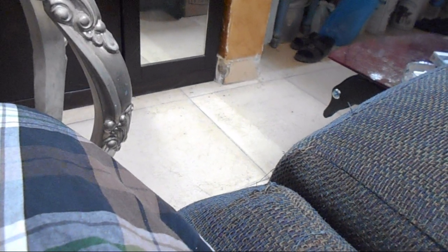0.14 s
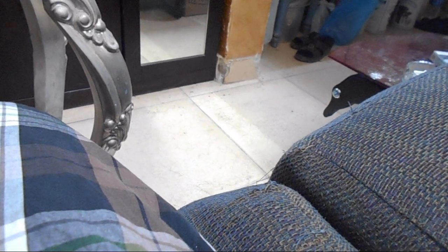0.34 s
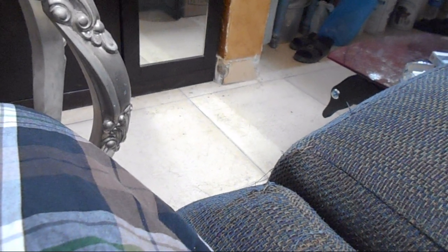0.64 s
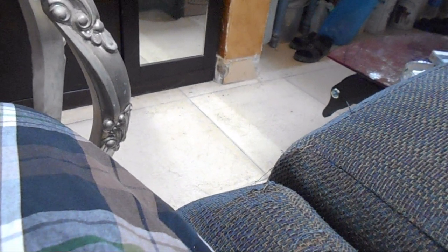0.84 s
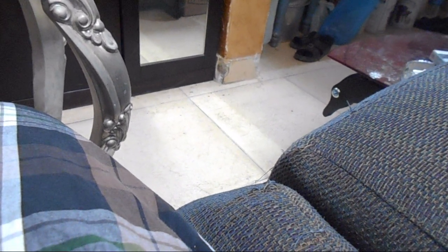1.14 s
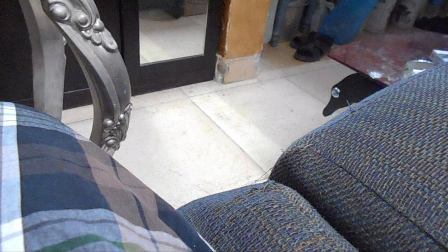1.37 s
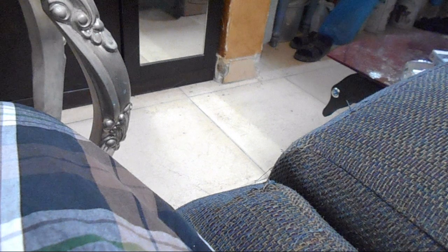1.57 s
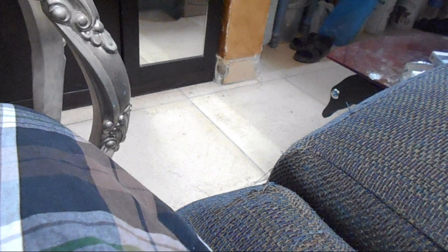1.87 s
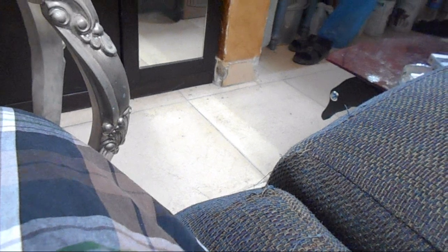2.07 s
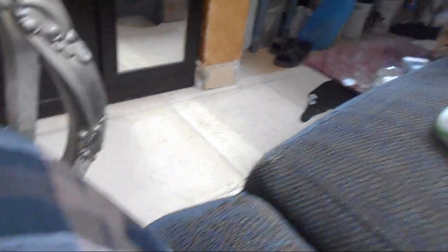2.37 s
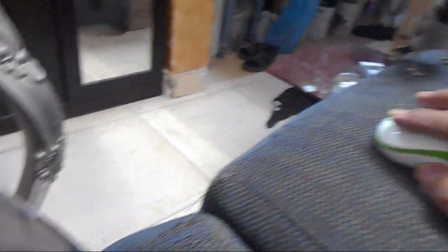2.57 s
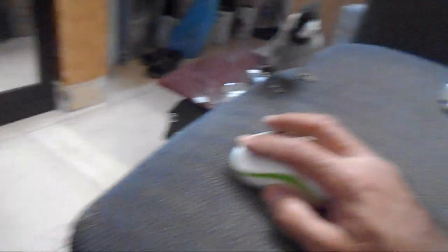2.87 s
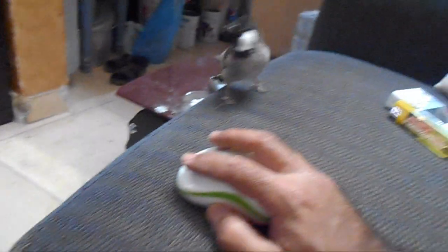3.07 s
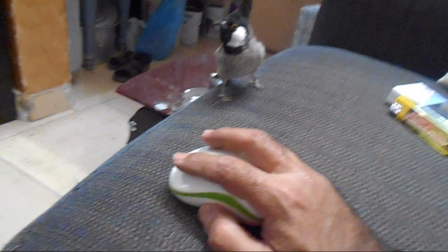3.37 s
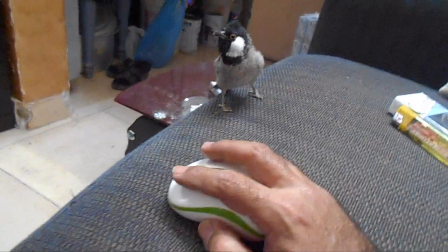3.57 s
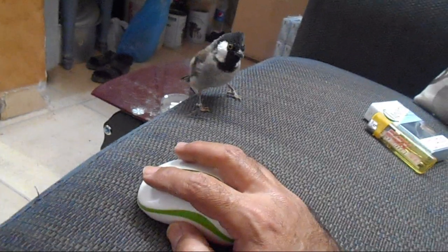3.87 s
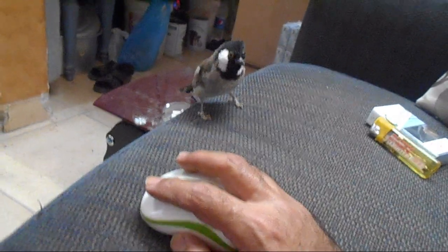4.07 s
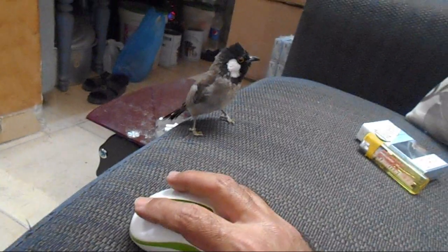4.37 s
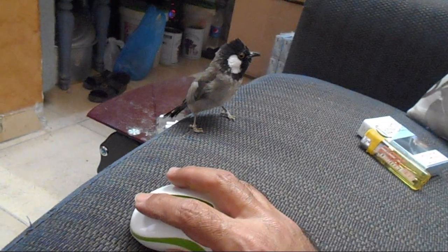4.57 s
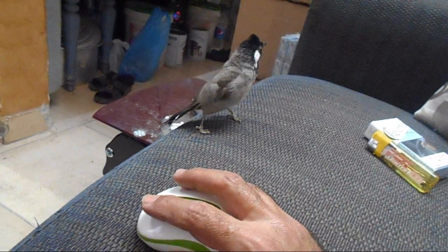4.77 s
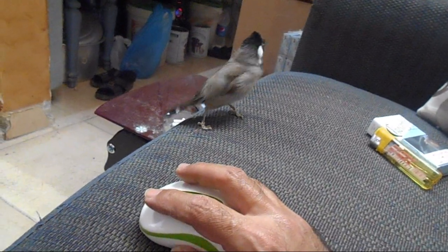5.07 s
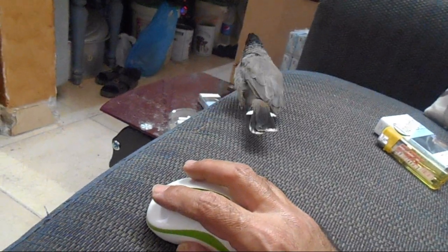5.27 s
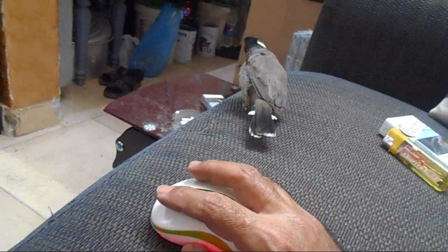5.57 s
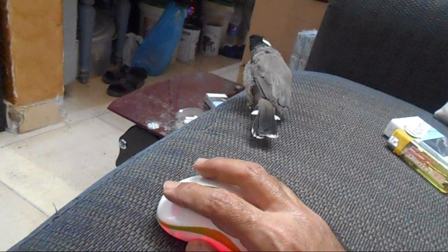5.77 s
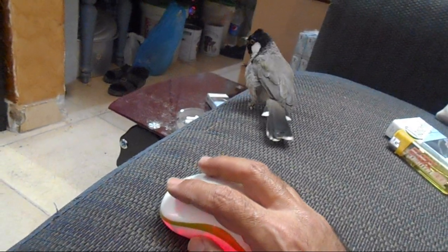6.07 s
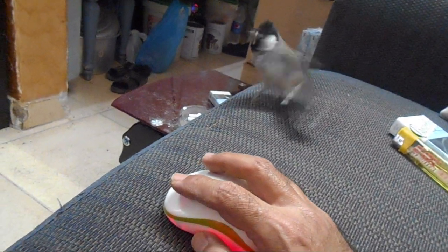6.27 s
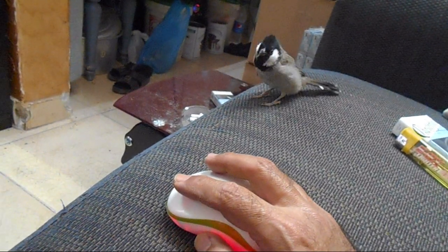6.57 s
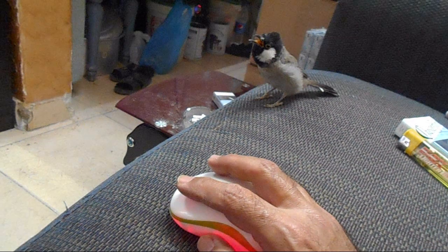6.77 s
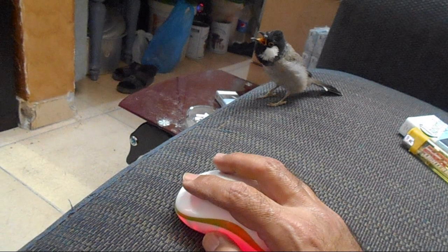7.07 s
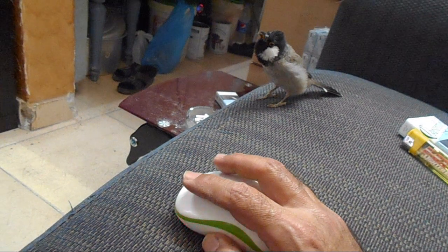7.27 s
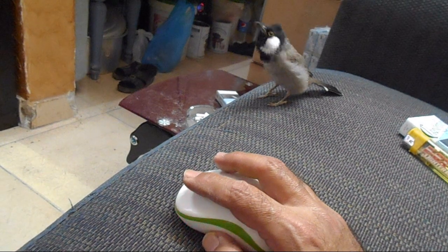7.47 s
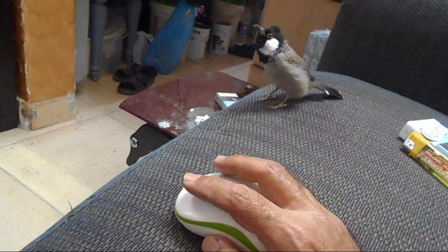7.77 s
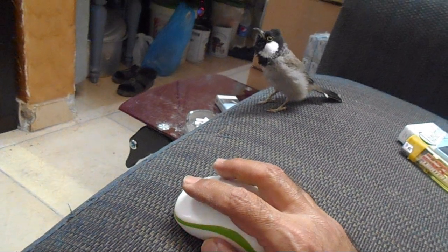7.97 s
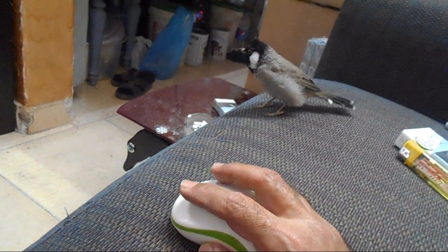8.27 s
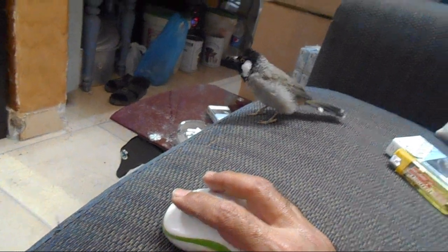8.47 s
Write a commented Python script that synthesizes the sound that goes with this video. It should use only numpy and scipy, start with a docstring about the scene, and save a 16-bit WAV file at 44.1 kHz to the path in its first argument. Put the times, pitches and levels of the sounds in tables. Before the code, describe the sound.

Indoors in a hard tiled room, a bird further off whistles a quick run of gliding notes, smeared by echo. A mouse button clicks sharply, press then release. A soft swish follows as the camera turns, with tiny claw ticks. The far bird whistles again twice, the near bird gives one soft raspy twitter, and a last whistled phrase closes. Close mono camera microphone, constant hiss and faint hum.

```python
"""A tiled room with a sofa, heard through a mono camera microphone close to a small songbird.
A second bird further off whistles four phrases, sine glides smeared by dense wall reflections.
The near bird softly twitters once: overtone stacks with pulsed hiss, shaped by throat and beak.
A mouse button clicks (ringing spring, rattling shell); claws, hops on the cushion and the swish of the
turning camera are shaped noise. Filtered noise makes hiss and a fading murmur, thin sines a faint machine hum."""
import sys
import numpy as np
from scipy import signal
from scipy.fft import rfft, irfft, next_fast_len
from scipy.io import wavfile
from scipy.ndimage import map_coordinates

SR = 44100
rng = np.random.default_rng(int(sys.argv[2]) if len(sys.argv) > 2 else 0)


def unload_wav(signal):
    """Save mono or channel-first audio to the path in sys.argv[1] as 16-bit WAV at rate SR, clipped to [-1, 1]."""
    wavfile.write(
        sys.argv[1],
        SR,
        np.round(np.clip(np.atleast_2d(signal).T, -1, 1) * 32767).astype(np.int16),
    )


def how_loud(loudness_db):
    """Turn decibels into a plain amplitude multiplier (0 dB gives 1, 20 dB gives 10)."""
    steps = np.asarray(loudness_db, float) / 20
    return 10 ** steps


N = 380583
TIME = np.arange(N) / SR


def unit(x):
    """Scales a sound to an rms of 1."""
    return x / np.sqrt(np.mean(x ** 2) + 1e-20)


def along(points, hz):
    """Reads a curve of (frequency [Hz], value) points on a log frequency axis."""
    f, v = np.transpose(points)
    return np.interp(np.log(hz + 1), np.log(f + 1), v)


def wobble(rate, size=N):
    """A smooth random curve through normal-distributed knots, rate knots a second."""
    knots = rng.standard_normal(int(size * rate / SR) + 4)
    return map_coordinates(knots, [np.arange(size) * rate / SR])


def coloured(x, spectrum):
    """Equalises x with a curve of (frequency [Hz], gain [dB]) points."""
    m = next_fast_len(len(x) + 8192)
    gain = how_loud(along(spectrum, np.fft.rfftfreq(m, 1 / SR)))
    return irfft(rfft(x, m) * gain, m)[:len(x)]


def add(track, s, x):
    """Mixes x into track from second s."""
    part = track[round(s * SR):][:len(x)]
    part += x[:len(part)]


def tail(gap_s, rise_s, early_db):
    """A room answer of energy 1: each frequency dies at its own speed, after a louder cluster of near walls."""
    # reverberation of the tiled room: (frequency [Hz], time to fall 60 dB [s])
    room_t60 = [(500, 0.705), (2500, 0.321), (8000, 0.25)]
    hz, t, z = signal.stft(rng.standard_normal(SR // 2), SR, nperseg=256)
    decay = how_loud(-60 * t / along(room_t60, hz)[:, None])
    h = signal.istft(z * decay, SR, nperseg=256)[1]
    t = np.arange(len(h)) / SR
    onset = 1 - np.exp(-t / rise_s)
    near_walls = 1 + how_loud(early_db) * np.exp(-t / 0.0265)
    h = np.pad(h * onset * near_walls, (round(gap_s * SR), 0))
    return h / np.linalg.norm(h)


def background():
    """Steady hiss, a low murmur of air that fades as the camera turns, and thin, unsteady motor lines."""
    # room air and microphone hiss: (frequency [Hz], relative level per Hz [dB])
    air = [(12, -19.5), (22, 5.5), (45, -8), (90, -9), (190, -6.5), (358, -2), (480, -6), (1100, -7),
           (1850, -7), (2480, -8.5), (5000, -12), (9810, -13.5), (11200, -20.5), (14600, -71),
           (22000, -120)]
    # low air murmur: (level before [dB], level after [dB]) and (fade start [s], fade end [s])
    murmur_db = (-64.5, -72)
    murmur_fades_s = (1.49, 5.5)
    # audible multiples of the motor rate: (multiple)
    hum = [2, 5, 7, 8, 10, 18, 19, 20, 21, 22, 23, 24, 25, 26, 27]
    # their mean strengths: (level before the camera turns [dB], level after [dB])
    hum_db = [(-77.5, -77), (-72, -75.5), (-85.5, -75), (-72, -84), (-76, -75.5), (-84.5, -86), (-75, -89),
              (-76, -82.5), (-76.5, -76.5), (-79, -75.5), (-90.5, -82.5), (-83, -72.5), (-73, -77),
              (-75.5, -83), (-77, -82.5)]
    # other steady tones: (frequency [Hz], mean level [dB])
    whines = [(101, -79), (199.5, -77), (263, -73), (1911, -79), (3015, -81), (10121, -80)]
    motor_hz, turn_s = 74.92, 3.23

    hiss = how_loud(-56.5) * unit(coloured(rng.standard_normal(N), air))
    murmur_colour = [(150, -18.5), (300, -8.0), (600, 3), (850, -5), (1200, -25.5)]
    murmur = unit(coloured(rng.standard_normal(N), murmur_colour))
    out = hiss + how_loud(np.interp(TIME, murmur_fades_s, murmur_db)) * murmur

    turned = np.clip((TIME - turn_s) / .5 + .5, 0, 1)  # 0 before the turn, 1 after it
    lines = [(k * motor_hz, a + (b - a) * turned) for k, (a, b) in zip(hum, hum_db)]
    for hz, db in lines + whines:
        level = np.sqrt(2) * how_loud(db + 2.515 * wobble(4))
        out += level * np.sin(2 * np.pi * hz * TIME + 0.667 * wobble(6))
    return out


def burst(colour, length, rise_s):
    """A puff of coloured noise with peak 1, rising and dying exponentially."""
    t = np.arange(SR // 20) / SR
    envelope = np.exp(-t / length) * (1 - np.exp(-t / rise_s))
    x = coloured(rng.standard_normal(len(t)), colour) * envelope
    return x / np.max(np.abs(x))


def cushion_and_swish():
    """Claw ticks and dull bumps as noise puffs; the camera's turning swish and hop rustle as grainy swells."""
    # claw ticks in the weave: (time [s], peak level [dB], pitch [Hz], decay time constant [s])
    ticks = [(2.8158, -40.5, 8600, 0.00174), (3.369, -43.5, 9370, 0.00235), (3.402, -44, 8890, 0.0031),
             (3.4082, -43.5, 8500, .003), (3.414, -37, 6361, 0.0034), (3.4264, -32.5, 7300, 0.0014),
             (3.429, -28.5, 7000, 0.00057), (7.256, -49.5, 8000, .003), (7.3698, -41, 8600, 0.00264)]
    # soft bumps: (time [s], peak level [dB], strongest frequency [Hz], decay time constant [s])
    bumps = [(5.353, -45.5, 141, 0.0123), (6.423, -51, 500, 0.022), (6.444, -42.5, 1104, 0.0065)]
    # the swish of the turning camera (first two rows), then cloth rustle from hops on the cushion:
    # (peak time [s], rise over 20 dB [s], fall over 20 dB [s], level [dB], share of fine bright noise [0-1])
    swells = [(2.63, 0.117, 0.63, -55, 0.304), (2.8, 0.4, 0.43, -60.5, 0.9984),
              (2.923, 0.015, 0.0504, -43, 0.968), (3.922, 0.022, 0.016, -47, 0.85),
              (5.234, .03, 0.115, -56.5, 1)]
    # coarse and fine grainy noise: (frequency [Hz], relative level per Hz [dB])
    coarse_colour = [(1000, -9.5), (2500, -6.5), (4200, 2.5), (6500, -2.5), (9000, -9), (11000, -20)]
    fine_colour = [(2000, -13), (4000, -30.5), (6000, -11), (8500, -1.5), (10500, -9)]

    out = np.zeros(N)
    for s, db, hz, length in ticks:
        colour = [(700, -30), (1500, -16), (hz * 0.834, -12), (hz, 0), (hz * 1.257, -9), (hz * 2, -20)]
        add(out, s, how_loud(db) * burst(colour, length, rise_s=0.00075))
    for s, db, hz, length in bumps:
        colour = [(hz * 0.215, -6), (hz, 0), (hz * 2.36, -24)]
        add(out, s, how_loud(db) * burst(colour, length, rise_s=0.00114))

    def grainy(colour):
        """Coloured noise whose level flickers quickly."""
        return unit(coloured(rng.standard_normal(N) * how_loud(1.72 * wobble(500)), colour))

    coarse, fine = grainy(coarse_colour), grainy(fine_colour)
    for s, rise, fall, db, share in swells:
        swell = how_loud(db - 20 * np.maximum((s - TIME) / rise, (TIME - s) / fall))
        out += swell * (np.sqrt(share) * fine + np.sqrt(1 - share) * coarse)
    return out


def ring(modes, t):
    """Sums damped sine modes, with new strengths for each blow."""
    out = np.zeros(len(t))
    for hz, db, t60 in modes:
        out += how_loud(db + rng.normal(0, 1.78) - 60 * t / t60) * np.sin(2 * np.pi * hz * t)
    return out


def mouse():
    """The spring snaps, brighter on the press than on the release; the shell rattles a moment later."""
    # button press and release: (time [s], snap peak level [dB], rattle relative to it [dB],
    # spring tilt [dB per octave])
    clicks = [(1.3993, -16.5, -18, 5.5), (1.6032, -13, -21, -4)]
    # modes of the switch spring: (frequency [Hz], relative level [dB], time to fall 60 dB [s])
    spring = [(7300, -4.5, 0.0177), (7810, 2.5, 0.0139), (8600, 2.5, 0.0098), (9330, -3.5, 0.0152),
              (10153, 1, 0.0068)]
    # rattle of the plastic shell: (frequency [Hz], relative level [dB])
    shell = [(1200, -18.5), (2800, -7), (3500, -4), (4500, -11), (5700, -3), (6600, -17), (8000, -24)]

    out, t = np.zeros(N), np.arange(SR // 10) / SR
    onset = (t / .0011) ** 2 / (1 + (t / 0.0016) ** 2)
    punch = 1 + 3 * np.exp(-(t / 0.00163) ** 2)
    rattle_shape = np.exp(-t / 0.00289) * (1 - np.exp(-t / 0.00055))
    for s, db, shell_db, tilt_db in clicks:
        modes = [(hz, level + tilt_db * np.log2(hz / 8000), t60) for hz, level, t60 in spring]
        snap = ring(modes, t) * onset * punch
        rattle = unit(coloured(rng.standard_normal(len(t)), shell)) * rattle_shape
        add(out, s, how_loud(db) * snap / np.max(np.abs(snap)))
        add(out, s + 0.00043, how_loud(db + shell_db) * rattle)
    return out


def song():
    """The far bird's notes as (s, pitch Hz, gain) per sample; pitch drifts and level fades as breath slackens."""
    # plain whistles that slide onto their pitch: (time [s], length [s], from [Hz], onto [Hz],
    # drifts towards [Hz], relative level [dB], fade [dB])
    slides = [(0.414, 0.023, 2640, 2540, 2398, -51, 11.5), (.45, 0.0485, 1968, 2276, 2241, -37, 6.5),
              (0.684, 0.0208, 2615, 2394, 1894, -47, 14.5), (0.781, 0.0403, 2035, 2061, 2064, -45, 1),
              (0.855, 0.0245, 2943, 3035, 2066, -46, -8.5), (4.218, .082, 1468, 2455, 2660, -37, 5.5),
              (4.311, 0.0365, 3410, 3346, 2822, -44, 9.5)]
    # notes with a soft lead-in that jumps up or down to the main tone: (time of the jump [s], lead-in [s],
    # lead-in pitch [Hz], main length [s], main pitch [Hz], drifts towards [Hz], relative level [dB], fade [dB])
    leaps = [(0.542, 0.0128, 1719, 0.0479, 2632, 2696, -34, 3),
             (0.645, 0.0039, 3332, 0.062, 2922, 2806, -33.5, 4.5),
             (0.821, 0.01434, 1546, 0.0304, 2671, 2539, -35.5, 16),
             (3.621, 0.00664, 3236, 0.041, 2876, 2829, -35.5, 13.5),
             (3.695, 0.0164, 1704, 0.0214, 2340, 2092, -34, 20),
             (3.76, 0.0054, 3238, 0.0568, 2966, 2528, -37, 1),
             (3.888, .008, 1512, .042, 2655, 2687, -35.5, 15),
             (4.123, .004, 3260, .042, 2659, 2461, -39.5, 9),
             (8.327, 0.01126, 3208, 0.033, 2874, 2787, -34.5, 7),
             (8.394, 0.0156, 1742, 0.0346, 2351, 2036, -40.5, 10),
             (8.463, 0.0115, 3160, 0.0607, 2885, 2531, -27.5, 17),
             (8.58, 0.0146, 1565, 0.043, 2663, 2672, -34, 21)]
    # time constants [s] of the slackening breath, the slide, the swell and the jump
    breath_s, settle_s, swell_s, leap_s = 0.0283, 0.00502, 0.00356, 0.002714
    lead_db = -15.5  # the lead-in under the main tone

    for s, length, start_hz, onto_hz, last_hz, db, fade_db in slides:
        t = np.arange(0, length, 1 / SR)
        slack = 1 - np.exp(-t / breath_s)
        aim = onto_hz + (last_hz - onto_hz) * slack
        hz = aim + (start_hz - onto_hz) * np.exp(-t / settle_s)
        yield s, hz, how_loud(db - fade_db * slack) * (1 - np.exp(-t / swell_s)) ** 2

    for s, lead, lead_hz, length, main_hz, last_hz, db, fade_db in leaps:
        after = np.maximum(np.arange(-lead, length, 1 / SR), 0)
        away = np.exp(-after / leap_s)  # share of the jump still to go
        slack = 1 - np.exp(-after / breath_s)
        aim = main_hz + (last_hz - main_hz) * slack
        # upward jumps are loud on the way, downward ones only on landing
        power = 2.37 if lead_hz < main_hz else 0.804
        gain = how_loud(db + lead_db * away ** power - fade_db * slack)
        yield s - lead, aim + (lead_hz - main_hz) * away, gain


def far_bird():
    """Slightly fluttering whistles heard mostly through the walls, which smear each glide into a band."""
    out = np.zeros(N)
    for s, hz, gain in song():
        k = np.arange(len(hz))
        soft_ends = np.clip(np.minimum(k / (.001 * SR), k[::-1] / (0.0023 * SR)), 0, 1)
        flutter = wobble(145.8, size=len(hz))  # moves level and pitch together
        phase = 2 * np.pi * np.cumsum(hz * (1 + 0.0123 * flutter)) / SR
        direct = np.sqrt(2) * gain * soft_ends * how_loud(1.51 * flutter) * np.sin(phase)
        walls = signal.fftconvolve(direct, tail(gap_s=0.000989, rise_s=0.0026, early_db=6.5))
        # the walls return a steady share of each note's energy
        walls *= np.linalg.norm(direct) / np.linalg.norm(walls)
        add(out, s, how_loud(-8) * direct)
        add(out, s, how_loud(4.5) * walls)
    return out


def twitter():
    """The near bird's notes as rows of (s, pitch Hz, relative level dB, overtones dB, rasp dB)."""
    # raspy falling churrs: (time [s], buzz length [s], from [Hz], relative level [dB],
    # ends below the middle [dB], rasp [dB], trailing murmur [s])
    churrs = [(7.189, 0.0179, 1406, -43, 8, -9, 0.0285), (7.504, 0.02535, 1675, -35.5, 3.5, 1, 0.0145),
              (7.649, 0.0172, 1254, -42.5, 4, -11, 0.0238)]
    # overtones of a churr: (at the start [dB], at the end of the buzz [dB], in the trail [dB])
    churr_overtones_db = (-5.5, 3, -10.5)
    # climbs to a shelf that end in an upward flick: (time of the flick [s], climb [s], shelf [s],
    # from [Hz], shelf pitch [Hz], relative level [dB])
    climbs = [(7.303, .025, 0.018, 909, 2067, -37.5), (7.427, .018, .021, 968.6, 1900, -38)]
    # a climb at its start, bend, shelf start, flick, mid flick, top and end:
    # (relative level [dB], overtones [dB], rasp [dB])
    climb_db = [(-7.5, -10, -12), (-16.5, -3, -18.5), (-13.5, -1, -15), (-8, -2.5, -18.5), (0.5, -10, -24),
                (-4.5, -7, -11.5), (-17, -3, -10.5)]
    # clear whistles, a pip and an arch: (time [s], pitch [Hz], relative level [dB])
    clear = [
        [(7.173, 2584, -46.5), (7.1795, 2654, -53.5), (7.183, 2715, -43), (7.189, 2911, -60.5)],
        [(7.595, 1128, -43), (7.603, 1362, -50), (7.608, 2286, -45), (7.615, 2829, -37), (7.62, 3246, -43),
         (7.626, 3351, -54), (7.636, 2866, -60.5), (7.642, 2024, -44)],
    ]

    churr_hz, fall_s, trail_db, trail_rasp_db = 730.2, 0.0057, -10.5, -3.5
    first, last, faint = churr_overtones_db
    for s, buzz, start_hz, db, ends_db, rasp_db, trail in churrs:
        t = np.append(np.linspace(0, buzz, num=6), [buzz + 0.0051, buzz + trail])
        hz = churr_hz + (start_hz - churr_hz) * np.exp(-t / fall_s)
        trailing = t > buzz
        level = db + np.where(trailing, trail_db, -ends_db * (2 * t / buzz - 1) ** 2)
        overtones = np.where(trailing, faint, first + (last - first) * (t / buzz) ** 2)
        yield np.transpose([s + t, hz, level, overtones, rasp_db + trail_rasp_db * trailing])

    # the climb starts slowly, then steps up: share of its time and pitch at the bend
    bend, bend_hz = .6, 1295
    shelf_rise_hz, top_hz, end_hz, flick_s, hook_s = 117.4, 3615, 3140, 0.00615, 0.0073
    for s, climb, shelf, start_hz, shelf_hz, db in climbs:
        t = [-climb - shelf, (bend - 1) * climb - shelf, -shelf, 0, flick_s / 2, flick_s, flick_s + hook_s]
        mid_flick_hz = (shelf_hz + top_hz) / 2
        hz = [start_hz, bend_hz, shelf_hz - shelf_rise_hz, shelf_hz, mid_flick_hz, top_hz, end_hz]
        yield [(s + a, f, db + level, over, rasp) for a, f, (level, over, rasp) in zip(t, hz, climb_db)]

    for rows in clear:
        yield [(*row, -9.5, -25) for row in rows]  # overtones and rasp in dB


def note(rows, edge_s):
    """Spreads a note's rows into per-sample columns, the level as gain with soft ends."""
    s, hz, db, *more = np.transpose(rows)
    t = np.arange(s[0], s[-1], 1 / SR)
    edge = np.clip(np.minimum(t - s[0], s[-1] - t) / edge_s, 0, 1)
    gain = edge * how_loud(np.interp(t, s, db))
    return [np.interp(t, s, hz), gain] + [how_loud(np.interp(t, s, c)) for c in more]


def near_bird():
    """Quick glides with overtones; raspy notes waver and buzz, air hissing once a cycle."""
    # the throat and beak: (frequency [Hz], gain [dB])
    throat = [(500, -14.5), (1500, 0.78), (2700, 6), (3500, -0.5), (4300, -6.5), (6500, 2.5), (9500, -5)]
    # air hissing past the beak: (frequency [Hz], relative level [dB])
    beak_hiss = [(2000, -19.5), (4000, -12.5), (6800, -5), (8000, -7.5), (9700, 4), (11000, -10)]

    tone, hiss = np.zeros(N), np.zeros(N)
    k = np.arange(2, 9)[:, None]  # overtone numbers
    for rows in twitter():
        hz, gain, overtones, rasp = note(rows, edge_s=0.0018)
        unsteady = np.clip(rasp, .1, 1)  # the raspier the note, the less regular the cycles
        waver = 1 + 0.0779 * unsteady * wobble(496.5, size=len(hz))
        phase = 2 * np.pi * np.cumsum(hz * waver) / SR
        gain = gain * how_loud(2 * unsteady * wobble(378, size=len(hz)))
        # on low clear stretches every other cycle is stronger
        gain = gain * (1 + 0.38 * (1 - unsteady) * (hz < 2300) * np.cos(phase / 2))
        partials = k ** -1.1 * (k * hz < 11000) * np.cos(k * phase + 0.395 * k * k)
        stack = np.sum(partials, axis=0)
        puffs = unit(((1 - np.cos(phase)) / 2) ** 1.67) * rng.standard_normal(len(hz))
        add(tone, rows[0][0], gain * np.sqrt(2) * (np.cos(phase) + overtones * stack))
        add(hiss, rows[0][0], gain * rasp * puffs)
    return coloured(tone, throat) + how_loud(5.5) * coloured(hiss, beak_hiss)


def scene():
    """Mixes all sources, the near ones with their room answer, alike into two channels."""
    room = tail(gap_s=.008, rise_s=0.0015, early_db=2)
    bird = near_bird()
    things = mouse() + cushion_and_swish()
    walls = signal.fftconvolve(how_loud(-11.0) * bird + how_loud(-14) * things, room)[:N]
    mix = far_bird() + bird + things + walls + background()
    return np.tile(mix, (2, 1))


def roll_off(x):
    """The treble ends steeply here."""
    return signal.sosfilt(signal.butter(12, 11350, fs=SR, output="sos"), x)


def record(dry):
    """The recorder keeps next to nothing above its band limit."""
    limit = [(10500, -0.5), (10900, -21.0), (11200, -77)]  # (frequency [Hz], gain [dB])
    mix = np.array([coloured(channel, limit) for channel in dry])
    return roll_off(mix)


dry = scene()
out = record(dry)
unload_wav(out)
```